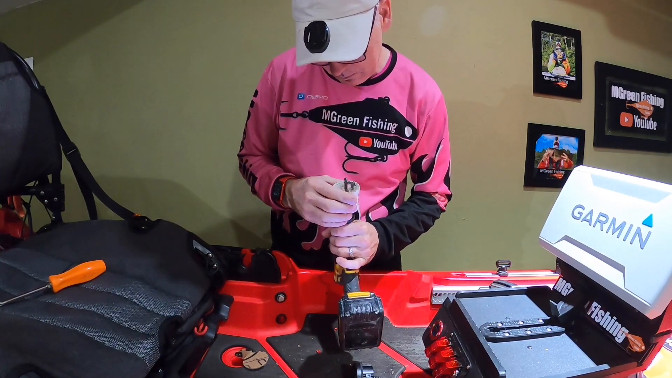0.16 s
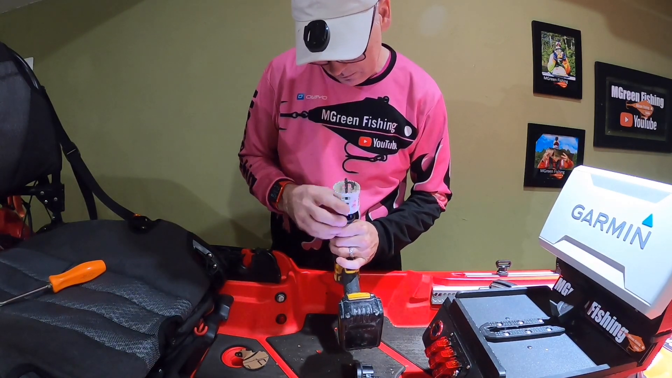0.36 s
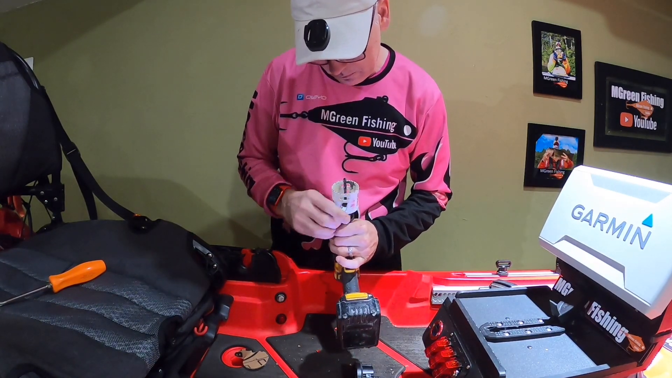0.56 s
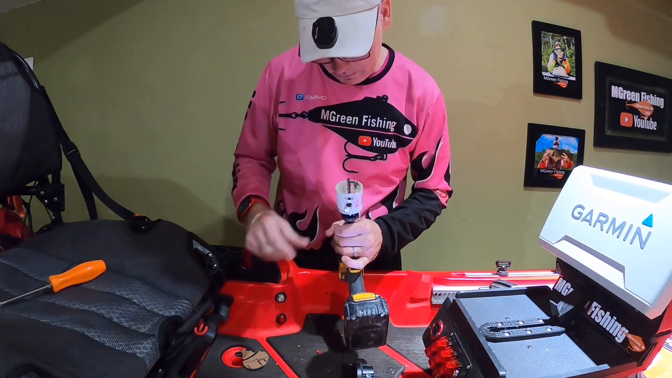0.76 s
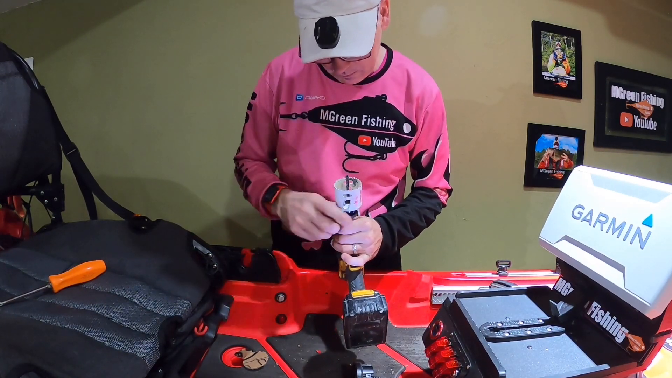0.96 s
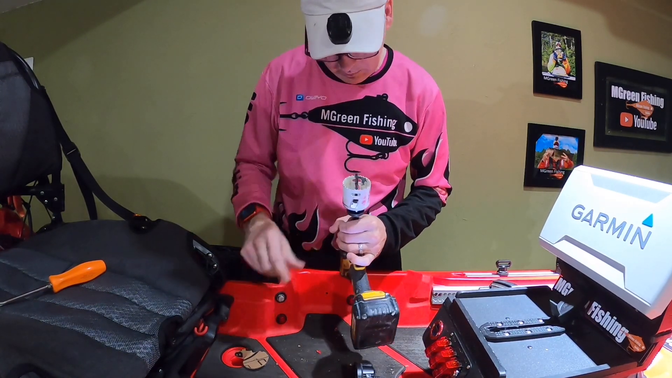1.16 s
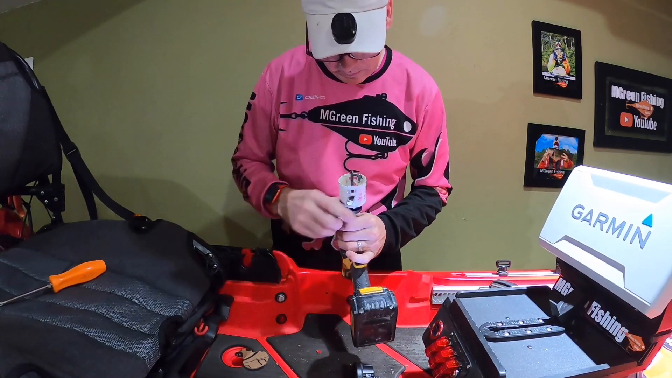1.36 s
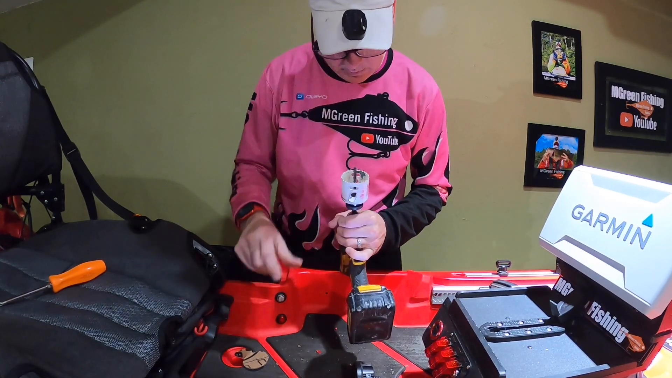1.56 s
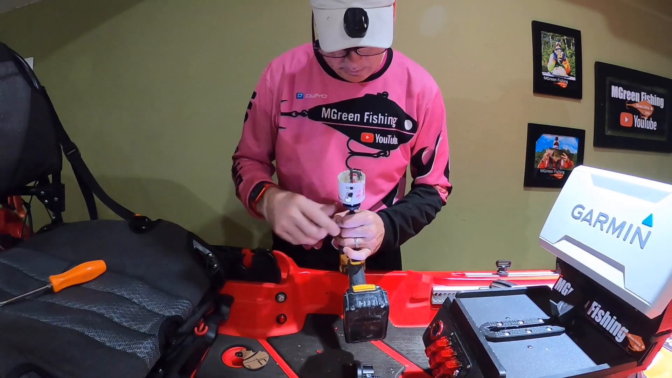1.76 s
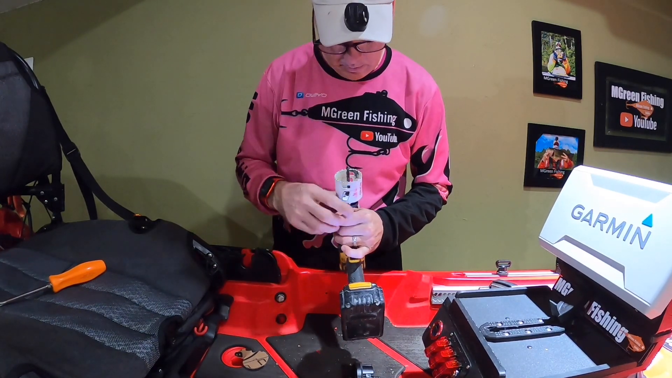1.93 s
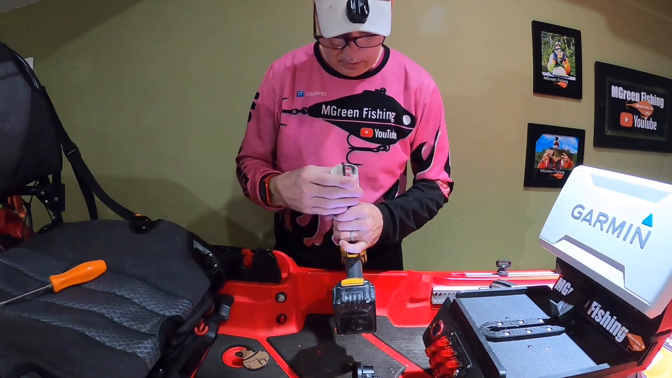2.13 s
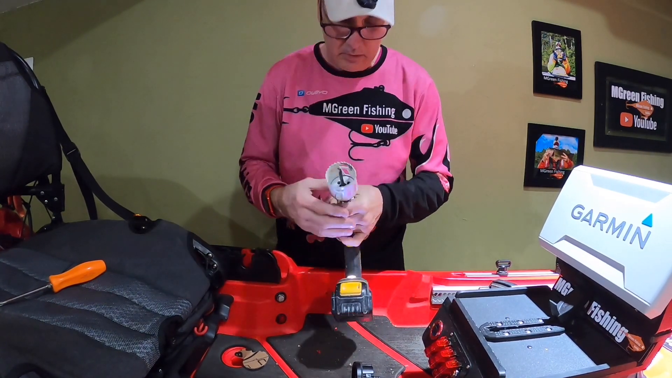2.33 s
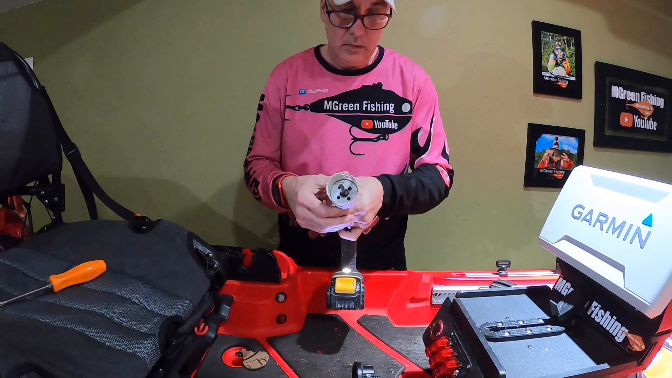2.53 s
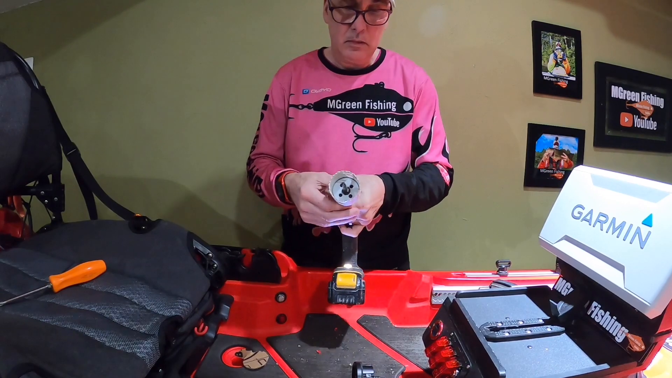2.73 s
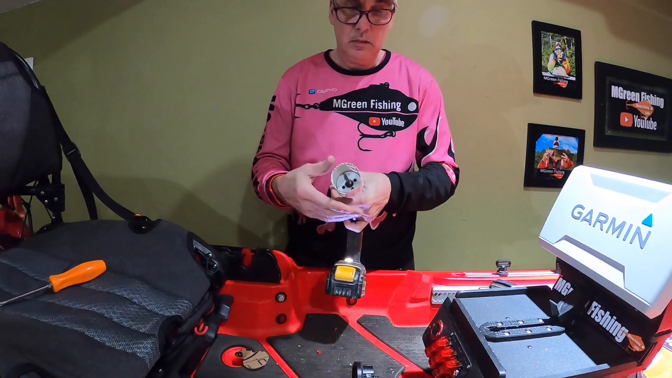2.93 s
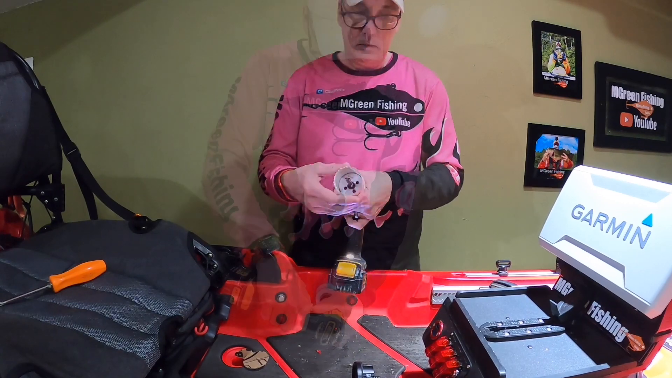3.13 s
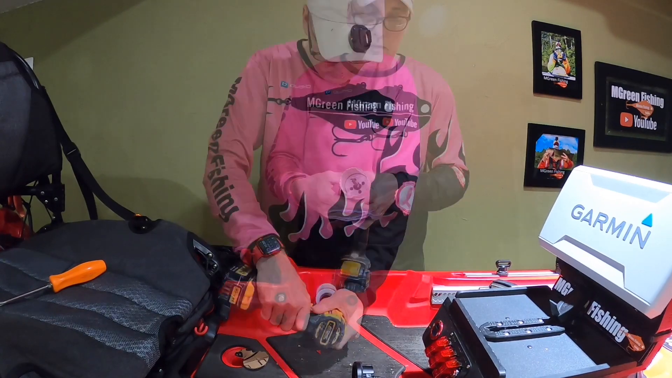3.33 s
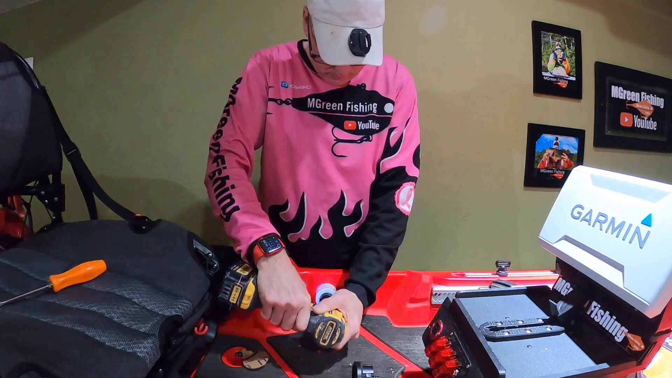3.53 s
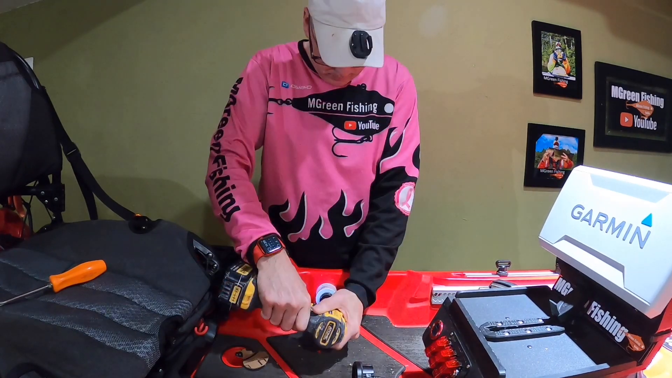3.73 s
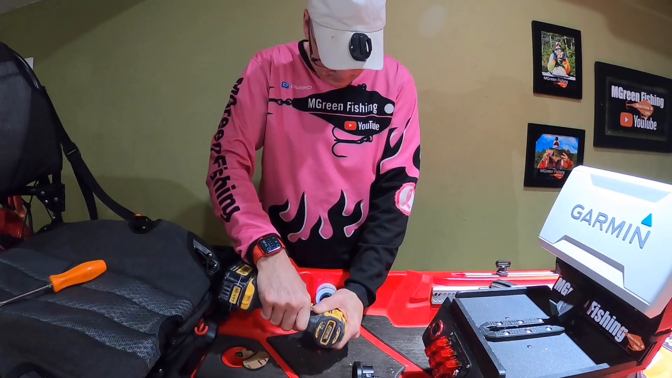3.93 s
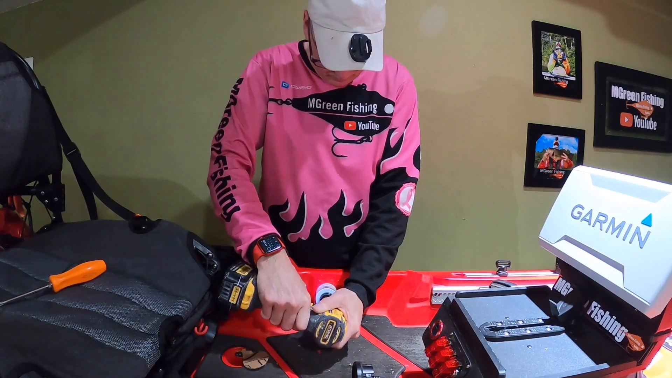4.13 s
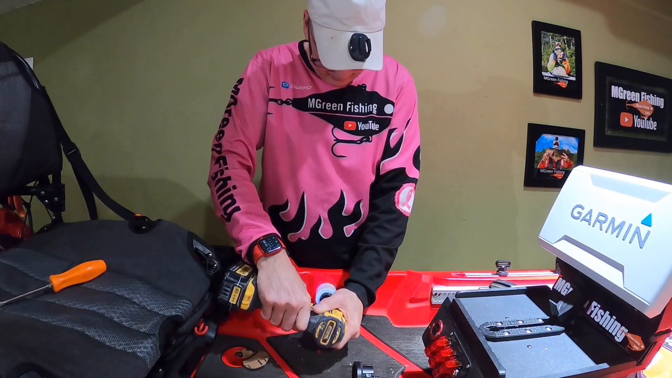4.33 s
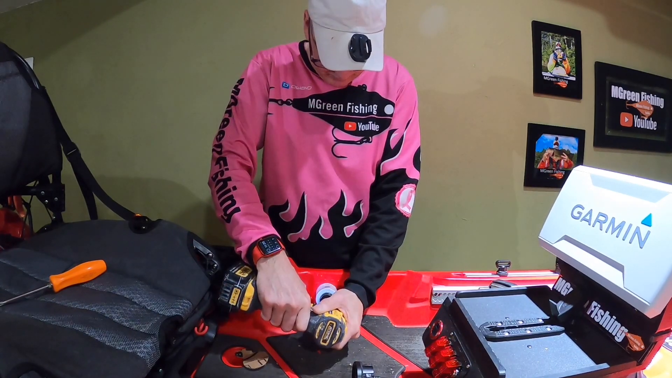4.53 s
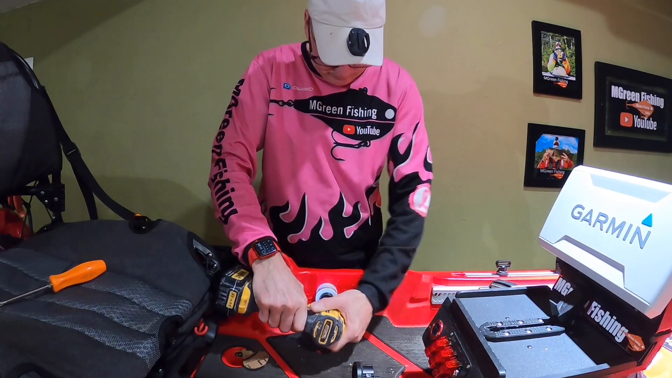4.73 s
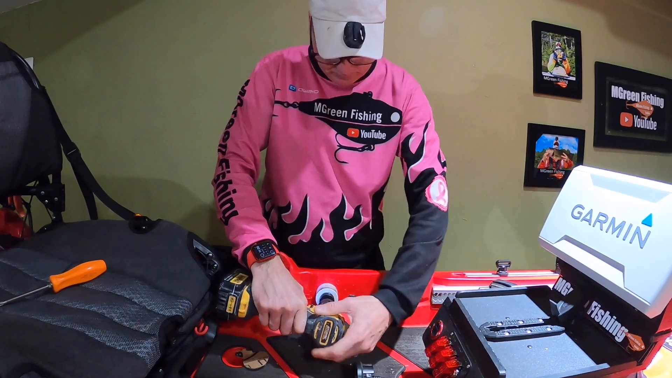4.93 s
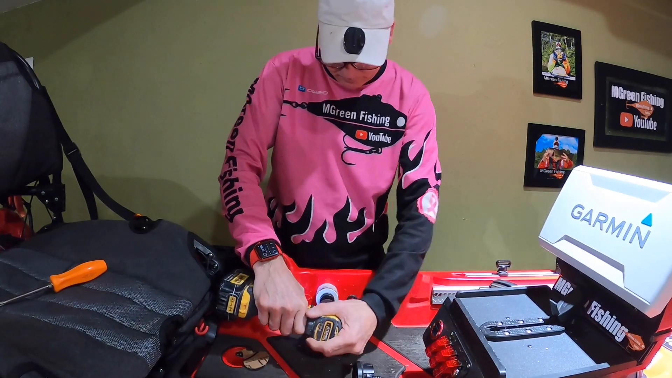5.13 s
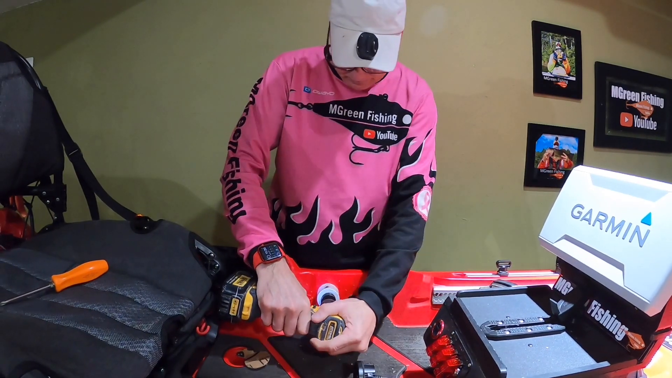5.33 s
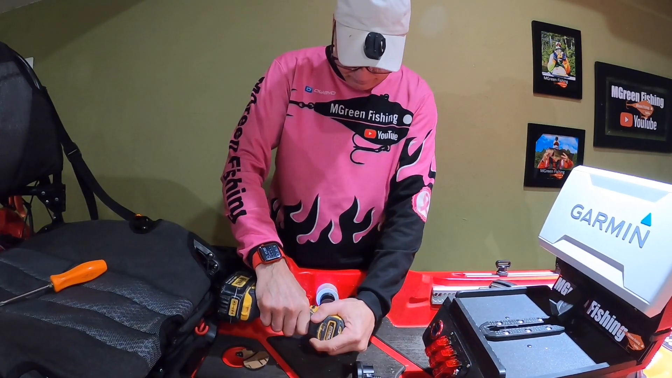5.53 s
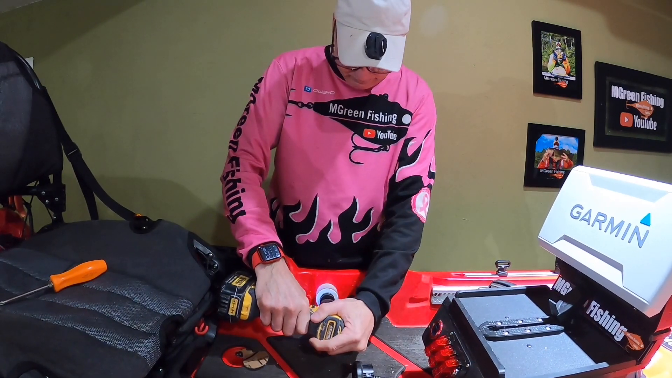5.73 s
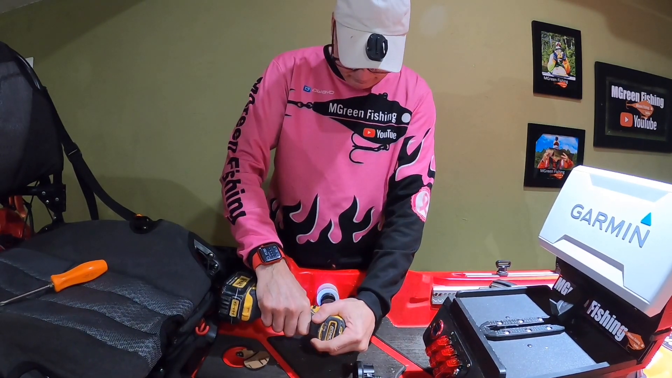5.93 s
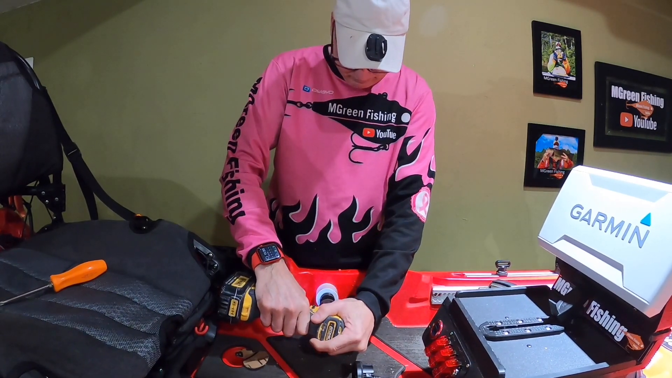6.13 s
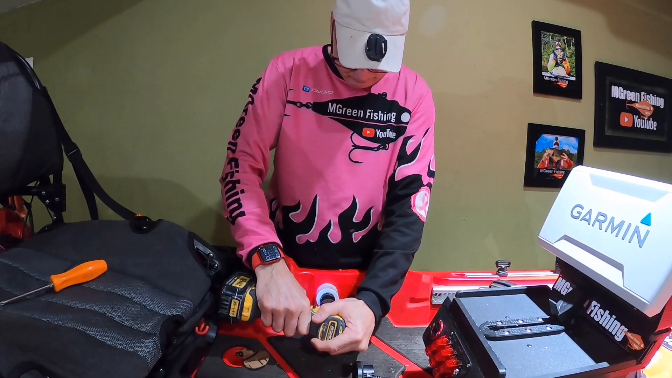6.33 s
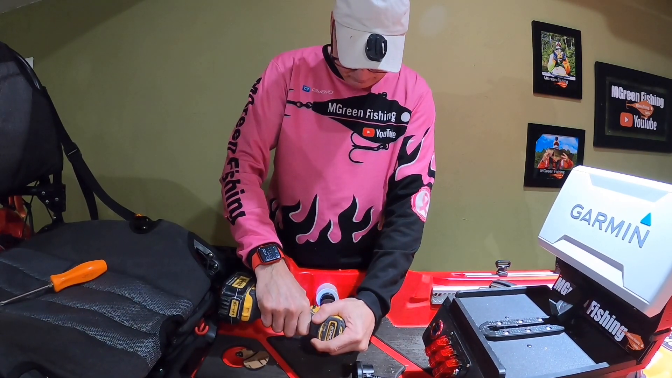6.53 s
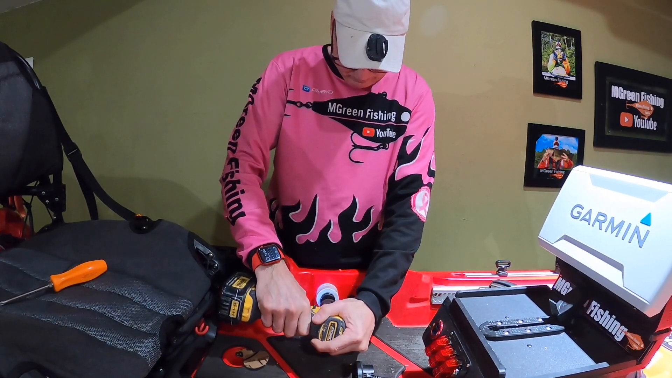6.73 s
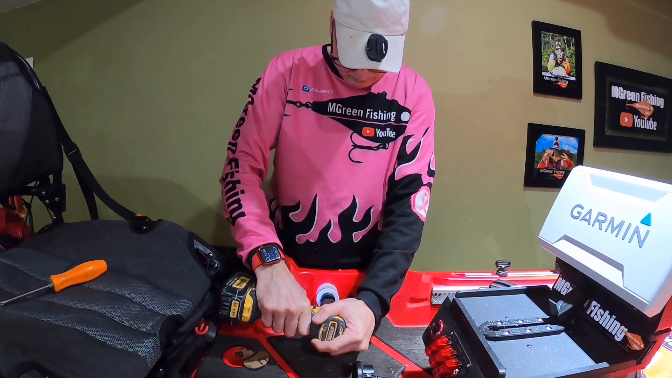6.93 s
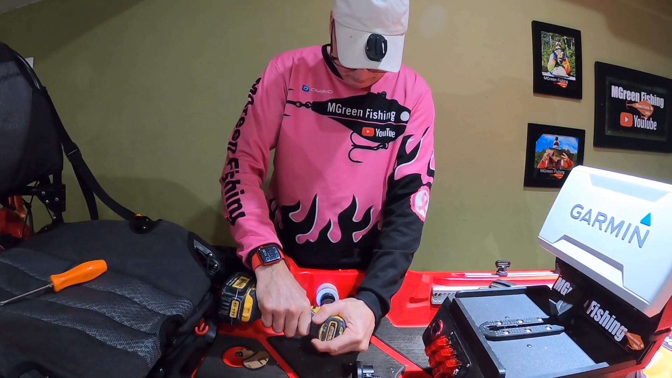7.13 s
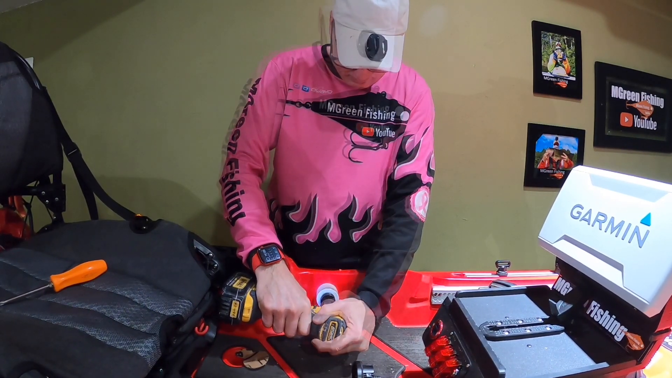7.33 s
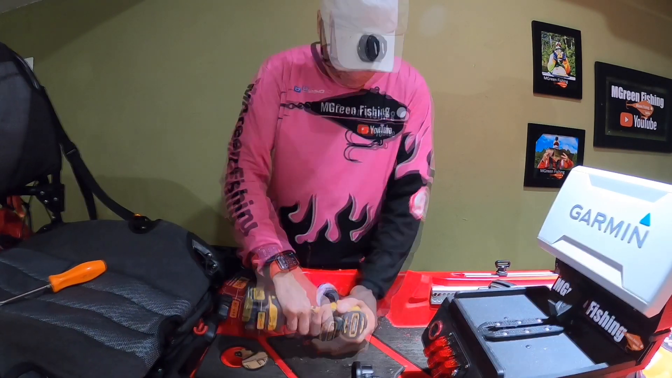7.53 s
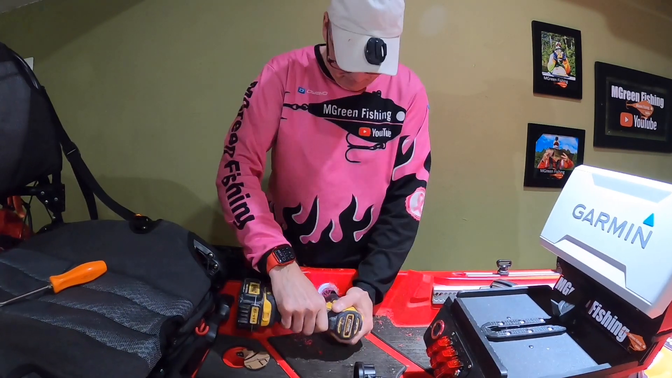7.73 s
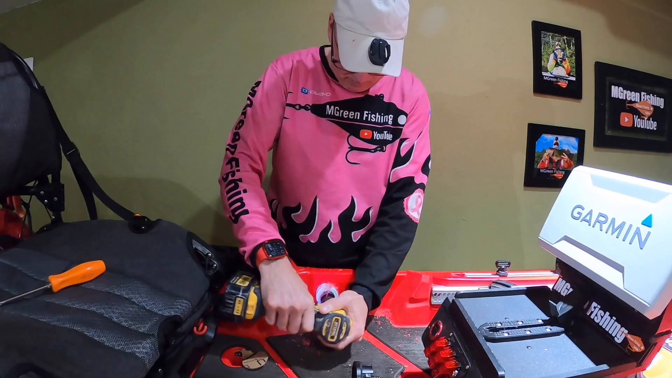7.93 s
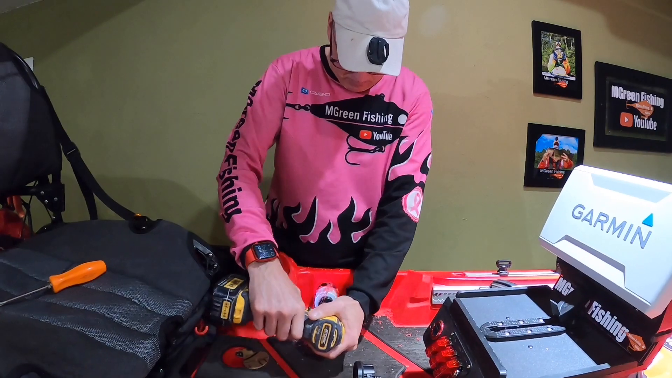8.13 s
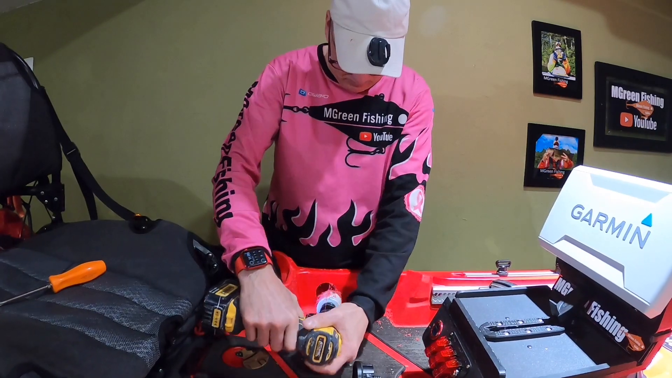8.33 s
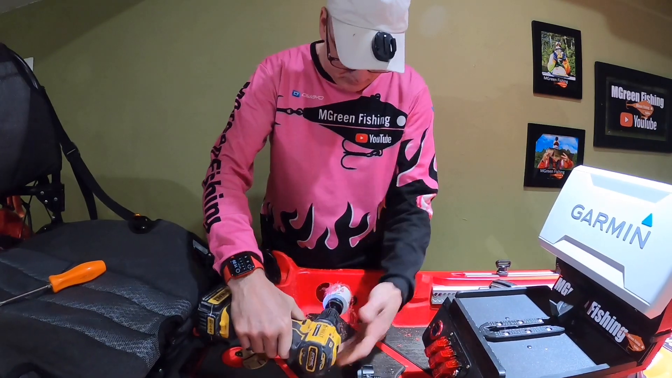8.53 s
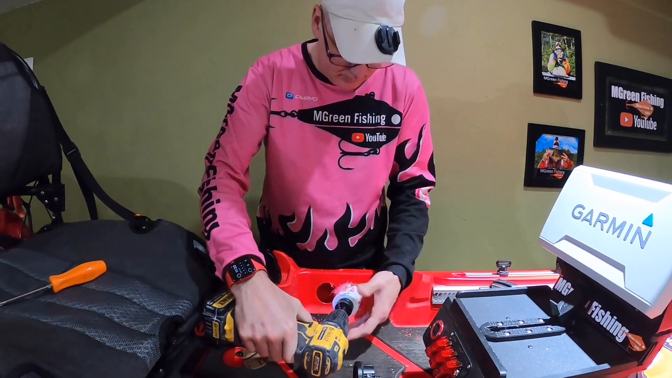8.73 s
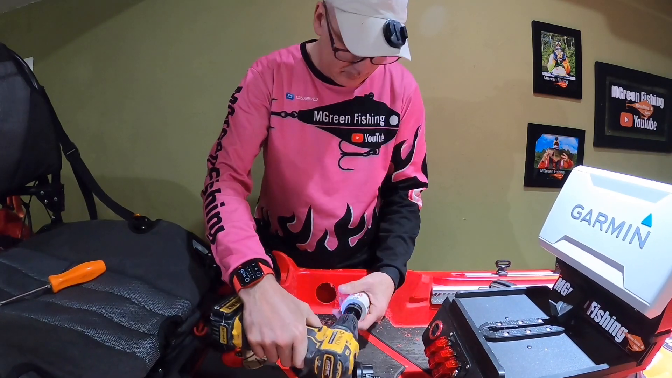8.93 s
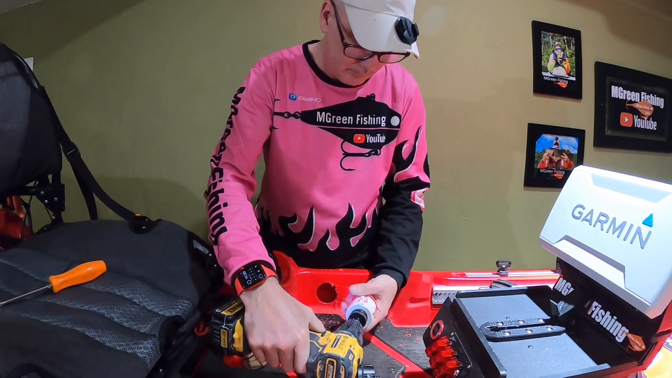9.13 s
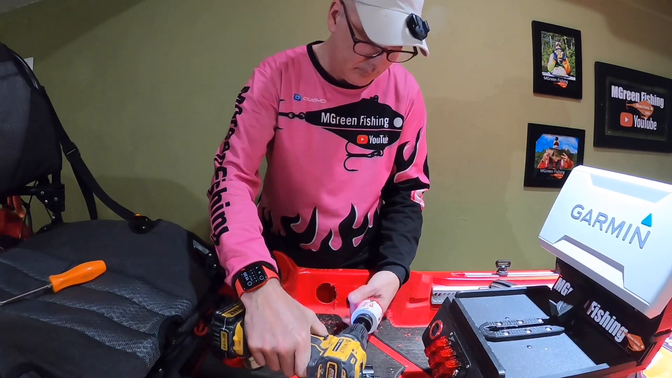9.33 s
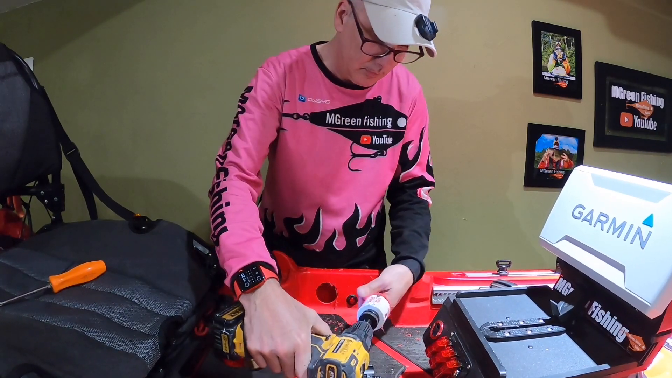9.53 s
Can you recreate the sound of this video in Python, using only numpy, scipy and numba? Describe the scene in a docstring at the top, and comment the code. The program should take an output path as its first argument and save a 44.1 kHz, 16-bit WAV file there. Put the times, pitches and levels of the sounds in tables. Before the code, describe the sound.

In a small workshop with low rumble and faint hiss, a steel hole saw clinks, scrapes and sings lightly as it is fitted. After a brief quiet a knock starts a cordless drill, grinding harshly through hollow plastic with abrupt changes of tone and squeals. Clattering knocks accompany its uneven slowdown, then only small ticks and rubs remain. Close stereo microphone, short bright room tail.

```python
"""First a low workshop rumble, then a steel hole saw clinks, scrapes and sings as it slides onto its arbor. A
cordless drill drives it through a hollow plastic hull in several cross-faded shots, squeals and fades away.
Blows ring the hull, the hardest leaving a brief rattling tail; ticks and rubs of handling are heard. Cutting is
coloured noise with tones locked to the chuck, struck steel and plastic are fading sines, and ticks, rubs and
squeals are filtered noise. All sources share one near position before a small two-port stereo microphone; walls
add a short bright tail."""
import sys
import numpy as np
from scipy import signal
from scipy.fft import rfft, irfft, next_fast_len
from scipy.io import wavfile
from scipy.ndimage import uniform_filter1d
from numba import njit

SR = 44100
rng = np.random.default_rng(int(sys.argv[2]) if len(sys.argv) > 2 else 0)


def unload_audio(sound):
    """Save the sound as a 16-bit wav file, at the path given as the first command line argument."""
    columns = np.transpose(np.atleast_2d(sound))
    # keep every value between -1 and 1, then stretch to whole-number steps
    steps = np.round(np.clip(columns, -1, 1) * 32767)
    wavfile.write(sys.argv[1], SR, steps.astype(np.int16))


N = 426006

# Workshop rumble, spectrum: pitch_hz, level_db (relative density)
RUMBLE = [(12, -54.5), (20, -27), (36, -5.5), (60, 4), (72, -5.5), (87, -16), (149, -6), (222, -25.5),
          (268, -26.5), (307, -32.5), (742, -52), (1110, -46), (2110, -55), (5980, -71), (12000, -77.5),
          (15600, -111), (22000, -120)]
# Humps in the rumble: pitch_hz, width_hz, level_db (over the rumble there)
HUM = [(50.1, 3.8, 0), (148, 21, -7.5), (1154, 14, 12)]
# Microphone balance: pitch_hz, left_over_right_db
LEFT_OVER_RIGHT = [(60, 1), (300, 0.5), (700, 1), (1300, 0.5), (2400, 2.5), (4400, 1.5), (8100, 0),
                   (15000, -5.5)]
# Microphone phase: pitch_hz, left_lead_rad (negative where the left port lags)
LEFT_LEADS = [(20, 0.1), (860, -0.58), (2670, -0.62), (5600, -0.85), (6800, -1.7), (9400, -1.6),
              (14000, -2.2)]

# Small hard ticks: start_s, level_db, pitch_hz, width_octaves
TICKS = [(2.215, -60.5, 2500, 2.1), (2.468, -63, 5940, 1.1), (2.735, -57, 4500, 1.8),
         (2.846, -55, 1250, 0.86), (3.068, -57, 1800, 1.6), (3.258, -25, 464, 1.5), (7.66, -22, 3500, 0.87),
         (7.831, -32, 3016, 2.9), (7.745, -26, 3000, 0.36), (7.906, -28, 3050, 1.3),
         (7.934, -27.5, 5630, 1.7), (7.948, -23.5, 2170, 2.6), (7.7, -30, 2980, .4), (7.775, -36, 3000, .4),
         (8.062, -36, 2550, 0.61), (8.438, -59, 2210, 1), (8.553, -55, 1300, 0.7), (8.604, -59, 1490, 1.5),
         (8.618, -40.5, 1500, 2.83), (8.865, -60, 2600, 0.35), (9.077, -52, 2200, 0.61),
         (9.534, -53.5, 4200, 0.93), (9.565, -55, 1100, 0.46)]
# Fingers and saw rubbing on plastic, and the rattling tail of the hard knock near 8.6 s: start_s, hold_s, #
# level_db, fade_db_per_s, centre_hz, width_hz (of each filter stage), air_db (treble against the body)
RUBS = [(2.24, .22, -77.5, 150, 1500, 1600, -12), (8.42, 0.023, -63, 158, 885, 1800, -10),
        (8.592, 0.033, -44, 108.5, 865, 1280, -57), (8.61, 0.15, -67.5, 500, 2320, 1270, -44),
        (8.815, 0.88, -70, 48, 1352, 1340, -9), (8.988, 0.025, -64, 195.5, 1480, 700, -15),
        (9.05, 0.13, -58.5, 208, 1900, 1380, -16), (9.266, 0.046, -65, 79, 1650, 1000, -19),
        (9.585, 0.066, -59, 100, 1690, 990, -23)]

# Modes of the hollow hull: pitch_hz, level_db, t60_s
HULL = [(87, -7, 0.4), (119, 1.5, 0.12), (151.7, -0.5, 0.35), (222, -1.5, 0.31), (321, -5.5, 0.11),
        (432, -1, 0.044), (714, -5.5, 0.092), (1090, -13, 0.046), (1784, -17.5, 0.05)]
# Knocks on the hull: start_s, peak_db, hardness_db (lift of the upper modes)
KNOCKS = [(3.258, -9, -6), (3.275, -15, -12.5), (5.537, -19, 2), (7.478, -18, -14.5), (7.506, -11.5, -4.5),
          (7.534, -10.5, -16.5), (7.571, -12, 7.5), (7.679, -14.5, 0), (7.761, -17, -8.5),
          (7.832, -20, -6.5), (8.062, -20.5, -10.5), (8.619, -21.5, 25.5), (8.652, -31, -8.5)]

# Modes of the steel saw cup: pitch_hz, level_db, t60_s
STEEL = [(1529, -7, .13), (1852, 1, 0.38), (2013, -9, .2), (3359, -20, 0.25), (3817, -22, 0.45),
         (3967, -15, 0.45), (4113, -1, 0.17), (4925, 3, 0.19), (6708, 2, 0.45), (7540, -6, .2),
         (9453, -6, 0.16), (9860, -6, 0.06), (10640, -9, .07)]
# Pitches at which the lifts of a clink are given: pitch_hz
CLINK_HZ = [1855, 4113, 4925, 6708, 10000]
# Clinks of the cup: start_s, level_db (before the trims of ring and strike),
# then one lift_db for the steel modes near each of CLINK_HZ
CLINKS = [(0.66, -44, -34, -20, -16, -27, -13), (0.682, -28.5, -40, -24, -4, -36, -17),
          (0.861, -29, -41, -20, -27, -26, -8), (1.097, -41.5, -23.5, -32, -12.5, -34.5, -10.5),
          (1.122, -29.5, -9, -20, -11, -34, -8.5), (1.483, -35, -7.5, -19.5, -15, -39.5, -36),
          (1.554, -17.5, -14, -11.5, -11, -36, -28)]
# Cup sliding on the arbor: start_s, hold_s, scrape_db, fade_db_per_s (of the scrape), sing_db
SLIDES = [(0.643, 0.21, -50, 211.5, -54.5), (1.084, 0.047, -48, 77.5, -47),
          (1.473, 0.11, -49.5, 165.5, -59)]
# Spectrum of the scrape: pitch_hz, level_db (relative)
SLIDE_COLOUR = [(350, -36), (590, -15), (870, -24), (1600, -11), (2300, -16.5), (5000, -20.5), (9000, -36),
                (14000, -62.5)]

# Short squeals, most gliding, during steady cutting, speeding up and slowing: start_s, length_s,
# from_hz, to_hz, level_db (before a 3 dB trim and a random waver)
SQUEALS = [(5.48, .1, 1200, 3400, -27), (5.52, .09, 2300, 2500, -29), (5.44, .04, 2350, 2400, -29),
           (4.74, .17, 1960, 2060, -33), (4.93, .22, 2010, 2130, -34), (5.0, .14, 1120, 1260, -37),
           (5.0, .12, 960, 1020, -36), (5.16, .08, 2090, 2060, -38), (5.07, .09, 8450, 8700, -50),
           (7.485, .03, 3900, 4050, -35), (7.525, .025, 1700, 1700, -29), (7.545, .06, 3980, 3740, -36),
           (7.6, .08, 3320, 3150, -35), (7.665, .08, 4100, 3780, -36), (7.71, .1, 2000, 1880, -42),
           (7.815, .06, 4000, 3520, -40), (7.85, .06, 4200, 3600, -45), (7.84, .07, 1520, 1330, -42),
           (8.035, .045, 2070, 2030, -47)]

# Shots of drilling, cross-faded: start_s, level_db, drone_db (120-300 Hz over 448-1300 Hz),
# bite_db (2-6 kHz over 448-1300 Hz), dig_db (extra that dies away after the start)
SHOTS = [(3.05, -25.5, 2, 0.5, -2.5), (4.739, -25.5, 1, -1.3, -0.5), (5.239, -25, -2, -3, -4.5),
         (5.452, -25.5, 4, 3.5, 1), (6.45, -25, 3, 2.5, 0), (7.499, -25, 6.5, -4, 4.5)]
# Chuck speed, before a slight random waver: time_s, speed_turns_per_s
CHUCK = [(3.05, 26.5), (4.7, 24.8), (5.38, 24), (5.45, 11.5), (5.52, 20.1), (5.585, 27.2), (6.0, 27.3),
         (6.42, 27.5), (6.5, 20.5), (7.45, 21.9)]
# Teeth tearing plastic, one list per shot: pitch_hz, level_db (relative density)
CUT = [
    [(70, -47), (115, -17), (220, -1), (350, -13), (740, -15.5), (1050, -19.5), (1300, -19), (2200, -21.5),
     (3900, -22.5), (6800, -35.5), (9200, -39.5), (15500, -60)],
    [(70, -60.5), (110, -6), (190, -3.5), (350, -8), (850, -14), (1000, -11.5), (1400, -18.5), (2100, -19),
     (4200, -23.5), (8700, -40), (15500, -59)],
    [(70, -45), (150, -11), (300, -15), (550, -10.5), (1400, -21), (3900, -21), (6000, -31), (15500, -53)],
    [(70, -52), (120, -24), (200, -5.5), (330, -16.5), (500, -11), (700, -17), (1550, -22), (2400, -19),
     (4300, -18), (6100, -29), (8300, -28.5), (15500, -57.5)],
    [(70, -52), (110, -33.5), (160, -7), (280, -15.5), (420, -9.5), (780, -17), (1070, -22), (2300, -18.5),
     (4300, -17.5), (5600, -28.5), (8700, -33.5), (15500, -58)],
    [(40, -40.5), (65, -9), (156, -6), (250, -9.5), (700, -10), (1000, -13), (2000, -22.5), (3100, -31.5),
     (4200, -29.5), (7900, -42), (15500, -60.5)],
]
# Saw and gearbox resonances, one list per shot: pitch_hz, width_hz, level_db (over the tearing there)
SING = [
    [(753, 28, 6.5), (2517, 73, 7), (1200, 92, 5), (3864, 130, 4.5), (4220, 59, 5.5), (9040, 90, 6.5)],
    [(557.5, 17, 11), (1026, 27, 4.5), (1237, 39, 8.5), (2050, 100, 5)],
    [(2330, 62, 5.5), (3860, 40, 11.5)],
    [(147, 37, 2), (2394, 140, 3.5), (2870, 35, 5.5), (3265, 55, 3.5), (3800, 120, 0.5), (8570, 130, 0.5)],
    [(2327, 90, 7), (2953, 72, 1.5), (4250, 64, 4), (8650, 340, 1.5)],
    [(160, 13, 7.5), (3110, 200, 7.5)],
]
# Tones that repeat on every turn, one list per shot: multiple_of_chuck_speed, level_db (before waver and speed)
TURN = [
    [(6, -2), (7, -2.5), (8, 1), (9, 5), (10, -1), (11, -10), (16, -14)],
    [(7, -3), (8, 2), (20, -26)],
    [(6, -3.5)],
    [(7, -16), (8, 4.5), (10, -19.5), (16, -15.5), (18, -2.5), (20, 3), (22, -17.5)],
    [(7, -5.5), (8, 2.5), (16, -16.5), (18, -12.5), (21, -4.5), (26, -6.5)],
    [],
]
# Gear and motor whines, one list per shot: multiple_of_chuck_speed, level_db (over the tearing, before waver)
WHINES = [
    [(100.5, -10), (153, -10), (356, -33)],
    [(83, -14), (168, -16)],
    [],
    [(88, -17), (297.5, -21), (305, -15.5)],
    [(113, -17), (138, -19), (197, -14.5), (397, -30)],
    [],
]
# Level of the drilling as it fades away unevenly at the end: time_s, level_db (against the shot);
# the first level also holds for all the cutting before it
FADE_AWAY = [(7.36, -4), (7.48, -7.5), (7.54, -5), (7.65, -6), (7.71, -9), (7.82, -13), (7.94, -16),
             (8.0, -28), (8.045, -24), (8.075, -17.5), (8.15, -28), (8.3, -50)]

RUMBLE_DB, RUMBLE_LEFT_DB = -40.5, 1.3  # level; left over right
ROOM_T60_S, ROOM_DB, ROOM_LOW_HZ = .2, -6.5, 2200
TOP_HZ = 15400  # upper limit of the microphone
TICK_CYCLES = 15  # fade time constant, in cycles of the tick's pitch
RUB_ATTACK_S, RUB_WANDER = .035, 0.1  # wander is in natural-log pitch
CONTACT_MS, UPPER_HZ = 0.64, 900  # contact at hardness 0; modes above UPPER_HZ follow hardness
CLINK_FADE_MS = 5
SLIDE_ATTACK_S, SING_ATTACK_S = 0.015, 0.048
SING_FADE_SHARE, SING_UPPER_DB = 0.78, -15  # share of the scrape's fade rate; upper tone against lower
RATTLE_DB, GRIP_S = -7, .004  # rattle against scrape; extra decay time constant
SQUEAL_WIDTH_HZ = 70.  # of each filter stage
BLEND_S, STOP_S = .04, 8.3
HULL_LOW_HZ = 130
DIG_IN_S = 0.14
RISE_S, SWELL_DB, SWELL_S = 0.041, -27, 0.17  # quick rise; starting level and time constant of the swell
DULL_FROM_DB = -14  # fading level below which the treble sinks further
BITE_PER_OCTAVE_DB = 4.5  # per octave of chuck speed
THROB = .4  # share of the low level

T = np.arange(N) / SR
NF = next_fast_len(N)
F = np.maximum(np.arange(NF // 2 + 1) * SR / NF, 1)


def undb(db):
    """Amplitude ratio of a level in dB."""
    return 10 ** (np.asarray(db) / 20)


def unit(x):
    """Scale to an RMS of one."""
    return x / np.sqrt(np.mean(x ** 2))


def curve(table):
    """Straight lines through (time, value) points, at every sample."""
    s, value = np.transpose(table)
    return np.interp(T, s, value)


def colour(x, points, peaks=()):
    """Filter by (Hz, dB) points and add the power of (Hz, width, dB) resonances."""
    hz, db = np.transpose(points)
    gain = undb(np.interp(np.log(F), np.log(hz), db))
    for f, width_hz, lift_db in peaks:
        lift_power = undb(2 * lift_db)
        gain = gain * np.sqrt(1 + lift_power / (1 + (2 * (F - f) / width_hz) ** 2))
    return irfft(rfft(x, NF) * gain, NF)[:N]


def band(x, lo, hi):
    """Keep lo to hi Hz with gentle slopes."""
    return signal.sosfilt(signal.butter(2, [lo, hi], "bandpass", fs=SR, output="sos"), x)


def walk(rate, size=N):
    """Random levels held 1 / rate s and slewed twice; spread near 1."""
    k = int(SR / rate)
    steps = np.repeat(rng.standard_normal(size // k + 1), k)
    return 1.1 * uniform_filter1d(uniform_filter1d(steps, k), k)[:size]


def grit(spread_db):
    """Noise of tiny chips, each sample with its own size."""
    return unit(rng.standard_normal(N) * undb(spread_db * rng.exponential(size=N)))


def ring(modes, lift_db=0):
    """Half a second of fading modes, each started at a random phase within half a cycle."""
    hz, db, t60 = np.transpose(modes)[:, :, None]
    t = T[:SR // 2]
    fade = np.exp(-np.log(1000) * t / t60)
    tone = np.sin(2 * np.pi * (hz * t + 0.47 * rng.random(hz.shape)))
    return np.sum(undb(db + lift_db) * fade * tone, axis=0)


def burst(lo_hz, hi_hz, ms):
    """A steeply band-limited puff of noise, quick up and fading with time constant ms."""
    t = T[:SR // 8] / (max(ms, .5) / 1000)
    x = band(band(rng.standard_normal(len(t)), lo_hz, hi_hz), lo_hz, hi_hz)
    return unit(x) * np.exp(-t) * (1 - np.exp(-5 * t))


def stroke(s, attack_s, hold_s, fade_db_per_s):
    """Gain that rises, holds, then fades at a steady rate."""
    fade_for_s = (T - s - attack_s - hold_s).clip(0)
    return ((T - s) / attack_s).clip(0, 1) ** 2 * undb(-fade_db_per_s * fade_for_s)


def add(out, s, x):
    """Mix x into out from s seconds on."""
    i = int(s * SR)
    out[i:i + len(x)] += x[:N - i]


@njit
def svf(x, hz, width):
    """State-variable band-pass with a moving centre."""
    y, b, l = np.empty(len(x)), 0., 0.
    for i in range(len(x)):
        g, k = np.tan(np.pi * hz[i] / SR), width / hz[i]
        v = (b + g * (x[i] - l)) / (1 + g * (g + k))
        b, l, y[i] = 2 * v - b, l + 2 * g * v, k * v
    return y


def workshop():
    """Low rumble common to both ports, drifting in level, and steady hiss opposite in sign at the two."""
    rumble = unit(colour(rng.standard_normal(N), RUMBLE, HUM))
    rumble *= undb(RUMBLE_DB + 1.2 * walk(3.9))
    hiss = band(unit(colour(rng.standard_normal(N), RUMBLE)), 2500, 16000)
    hiss *= undb(RUMBLE_DB - 2.5)
    tilt = undb([[RUMBLE_LEFT_DB / 2], [-RUMBLE_LEFT_DB / 2]])
    return rumble * tilt + np.array([hiss, -hiss])


def walls(near):
    """The walls return an unrelated fading tail to each port, mostly in the treble."""
    t = T[:SR // 2]
    highpass = signal.butter(2, ROOM_LOW_HZ, "highpass", fs=SR)
    returns = []
    for _ in range(2):
        tail = signal.lfilter(*highpass, rng.standard_normal(len(t)))
        tail *= np.exp(-np.log(1000) * t / ROOM_T60_S) * (t > .002)
        returns.append(signal.fftconvolve(near, unit(tail))[:N])
    return undb(ROOM_DB) * np.array(returns) / np.sqrt(len(t))


def handling():
    """Short noise ticks, lower ones lasting longer, and patchy rubs whose colour wanders."""
    out = np.zeros(N)
    for s, db, hz, octaves in TICKS:
        half_width = 2 ** (octaves / 2)
        tick = burst(hz / half_width, min(hz * half_width, 15000), 1000 * TICK_CYCLES / hz)
        add(out, s, undb(db) * tick)
    dust, patchy = grit(3.4), undb(1.1 * walk(30))
    wander = np.exp(RUB_WANDER * walk(12))
    air = unit(band(band(dust, 4000, 10300), 3700, 15000))
    for s, hold_s, db, fade, hz, width_hz, air_db in RUBS:
        i = int(s * SR)
        body = dust[i:]
        for _ in range(3):
            body = svf(body, hz * wander[i:], 1. * width_hz)
        gain = undb(db) * (stroke(s, RUB_ATTACK_S, hold_s, fade) * patchy)[i:]
        out[i:] += gain * (unit(body) + undb(air_db) * air[i:])
    return out


def hull():
    """Blows ring the hollow plastic; a harder one is shorter and wakes the upper modes."""
    out = np.zeros(N)
    upper = np.transpose(HULL)[:1].T > UPPER_HZ
    for s, db, hard_db in KNOCKS:
        contact_ms = CONTACT_MS * 2 ** (-min(hard_db, 8) / 10)
        contact = np.hanning(int(contact_ms * SR / 1000))
        blow = signal.fftconvolve(ring(HULL, hard_db * upper), contact / contact.sum())
        add(out, s, undb(db) * blow / np.abs(blow).max())
    return out


def clinks():
    """Each clink rings the steel modes by where the cup is hit, under a noisy strike."""
    out = np.zeros(N)
    steel_hz = np.transpose(STEEL)[:1].T
    for s, db, *mode_db in CLINKS:
        lift_db = np.interp(np.log(steel_hz), np.log(CLINK_HZ), mode_db)
        add(out, s, undb(db - 3) * ring(STEEL, lift_db))
        bright_hz = CLINK_HZ[np.argmax(mode_db)]
        strike = burst(740, 9400, CLINK_FADE_MS)
        strike += 1.5 * burst(bright_hz / 1.2, bright_hz * 1.093, CLINK_FADE_MS)
        add(out, s, undb(db - 6) * strike)
    return out


def slides():
    """Sliding on the thread scrapes, rattles the gripped cup and keeps two steel modes singing."""
    out = np.zeros(N)
    dust = grit(2.1) * undb(3.3 * walk(60))
    gripped = ring(STEEL[:8]) * np.exp(-T[:SR // 2] / GRIP_S)
    rattle = signal.fftconvolve(dust, gripped)[:N]
    scrape = unit(colour(dust, SLIDE_COLOUR)) + undb(RATTLE_DB) * unit(rattle)
    lower, upper = (undb(2.2 * walk(55)) * np.sin(2 * np.pi * STEEL[i][0] * T) for i in (1, 4))
    sing = unit(lower + undb(SING_UPPER_DB) * upper)
    for s, hold_s, db, fade, sing_db in SLIDES:
        out += undb(db) * stroke(s, SLIDE_ATTACK_S, hold_s, fade) * scrape
        out += undb(sing_db) * stroke(s, SING_ATTACK_S, hold_s, SING_FADE_SHARE * fade) * sing
    return out


def squeals():
    """Short, rough squeals: noise ringing a narrow resonance that in most of them slides."""
    out = np.zeros(N)
    for s, length_s, from_hz, to_hz, db in SQUEALS:
        n = int(length_s * SR)
        hz = np.linspace(from_hz, to_hz, n)
        whine = svf(svf(rng.standard_normal(n), hz, SQUEAL_WIDTH_HZ), hz, SQUEAL_WIDTH_HZ)
        gain = undb(db - 3 + 3 * walk(70, n)) * np.sqrt(np.hanning(n))
        add(out, s, gain * unit(whine))
    return out


def cutting(chips, speed, turns, span, dull_db, drone_db, bite_db, cut, sing, orders, whines):
    """One shot: torn plastic with tones locked to the chuck, its low and top bands levelled apart."""
    sound = colour(chips, cut, sing)[span]
    sound /= np.std(band(sound, 448, 1300))
    speed, turns, dull_db = speed[span], turns[span], dull_db[span]
    n = len(sound)
    pace = (speed / np.median(speed)).clip(0, 1)
    for order, db in orders:  # the pattern builds with speed
        waver_db = 1.6 * walk(9, n) + 2.5 * walk(40, n)
        radiated = (order * speed / HULL_LOW_HZ).clip(0, 1) ** 4  # the hull radiates little lower down
        tone = np.sin(2 * np.pi * (order * turns + .06 * walk(5, n)))
        sound += np.sqrt(pace) * radiated * undb(db + waver_db) * tone
    low, top = band(sound, 23, 420), band(sound, 1800, 18000)
    low *= 1 + THROB * np.cos(2 * np.pi * turns)  # the hull booms once a turn
    # the cut chatters: both bands waver
    drone_db = drone_db + 2 * walk(22, n) + walk(10, n)
    bite_db = bite_db + .6 * walk(60, n) + dull_db + BITE_PER_OCTAVE_DB * np.log2(pace)
    sound += low * (undb(drone_db) / np.std(band(low, 120, 300)) - 1)
    sound += top * (undb(bite_db) / np.std(band(top, 2000, 6000)) - 1)
    for order, db in whines:
        sound += undb(db + 2.3 * walk(30, n)) * np.sin(2 * np.pi * order * turns)
    return sound


def drill():
    """Cross-faded shots, each with its own tearing colour, swelling at the start and fading away at the end."""
    speed = curve(CHUCK)
    turns = np.cumsum(speed * (1 + .0025 * walk(14))) / SR
    chips = grit(1.0) * undb(0.15 * np.sin(2 * np.pi * turns))  # the saw runs out of true
    chips *= undb(1.2 * walk(260) + .6 * walk(45))  # teeth catch unevenly
    fade_db = curve(FADE_AWAY)
    dull_db = (fade_db - DULL_FROM_DB).clip(None, 0)  # the quietest cutting loses more treble
    out = np.zeros(N)
    ends = [row[0] for row in SHOTS[1:]] + [STOP_S]
    half = BLEND_S / 2
    for shot, t1, cut, sing, orders, whines in zip(SHOTS, ends, CUT, SING, TURN, WHINES):
        t0, level_db, drone_db, bite_db, dig_db = shot
        span = slice(int((t0 - BLEND_S) * SR), int((t1 + BLEND_S) * SR))
        sound = cutting(chips, speed, turns, span, dull_db, drone_db, bite_db, cut, sing, orders, whines)
        t = T[span]
        effort_db = level_db + dig_db * np.exp(-(t - t0).clip(0) / DIG_IN_S)
        blend = np.interp(t, [t0 - half, t0 + half, t1 - half, t1 + half], [0, 1, 1, 0])
        out[span] += sound * undb(effort_db) * blend
    for hz in (1700, 3300):  # the kerf rings at pitches that keep shifting
        out += .45 * svf(out, hz * np.exp(.2 * walk(12)), 260.)
    start = SHOTS[0][0]
    swell_db = SWELL_DB * np.exp(-(T - start).clip(0) / SWELL_S)
    return out * stroke(start, RISE_S, 0, 0) * undb(swell_db + fade_db)


def scene():
    """The near sources reach both ports alike, over the workshop and its walls."""
    near = handling() + hull() + clinks() + slides() + squeals() + drill()
    return workshop() + walls(near) + near


def record(dry):
    """The microphone's two ports differ in balance and phase; the top is cut."""
    balance_hz, balance_db = np.transpose(LEFT_OVER_RIGHT)
    lead_hz, lead_rad = np.transpose(LEFT_LEADS)
    balance_db = np.interp(np.log(F), np.log(balance_hz), balance_db)
    lead_rad = np.interp(np.log(F), np.log(lead_hz), lead_rad)
    half = undb(balance_db / 2) * np.exp(.5j * lead_rad)  # each port takes half the difference
    ports = irfft(rfft(dry, NF) * np.array([half, 1 / half]), NF)[:, :N]
    return signal.sosfilt(signal.ellip(10, .2, 80, TOP_HZ, fs=SR, output="sos"), ports)


dry = scene()
out = record(dry)
unload_audio(out)
```